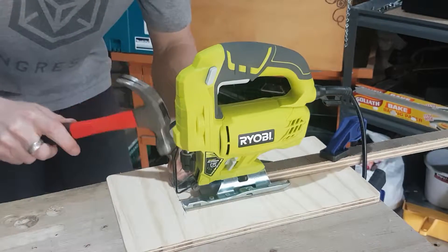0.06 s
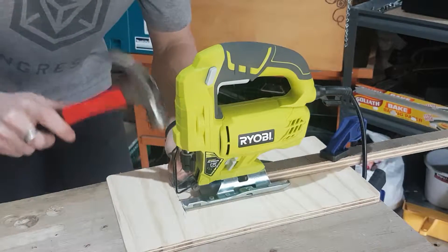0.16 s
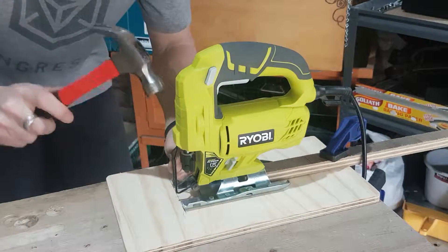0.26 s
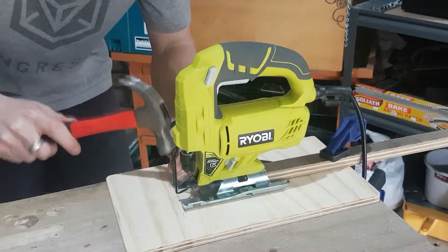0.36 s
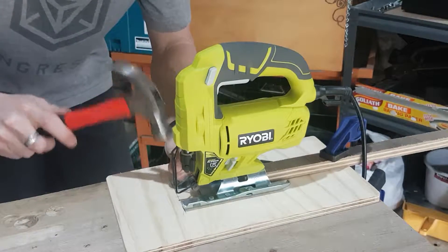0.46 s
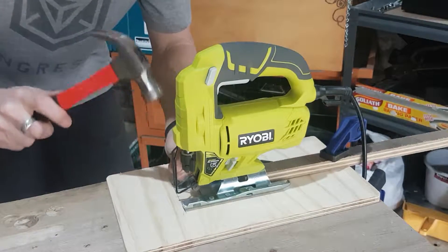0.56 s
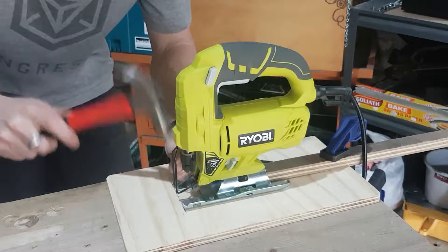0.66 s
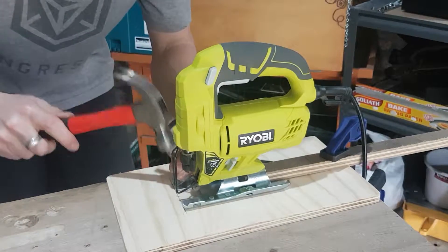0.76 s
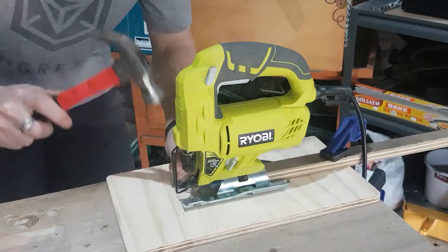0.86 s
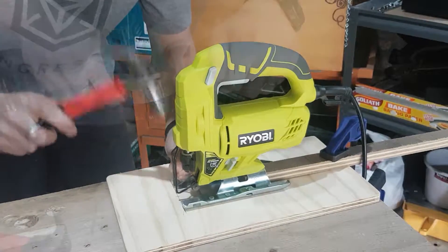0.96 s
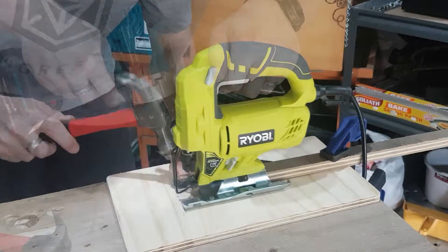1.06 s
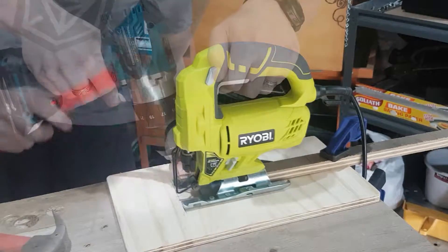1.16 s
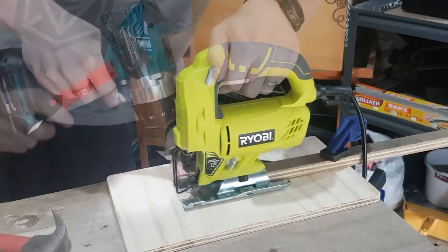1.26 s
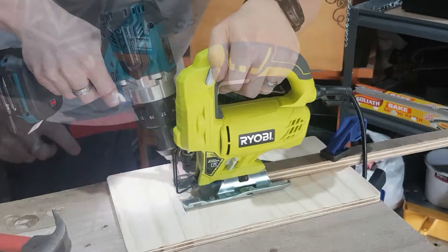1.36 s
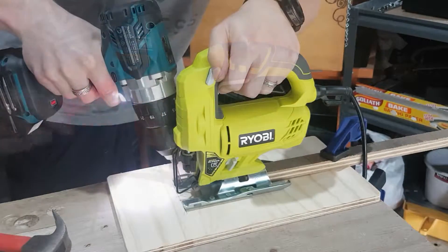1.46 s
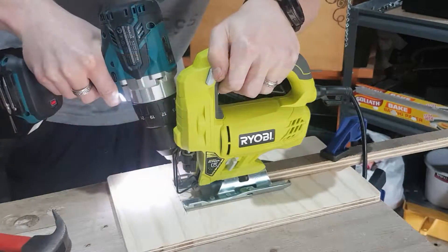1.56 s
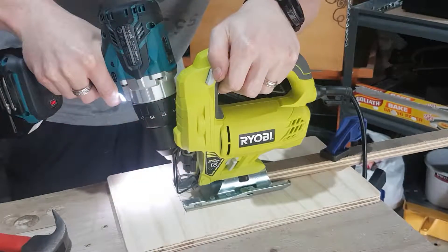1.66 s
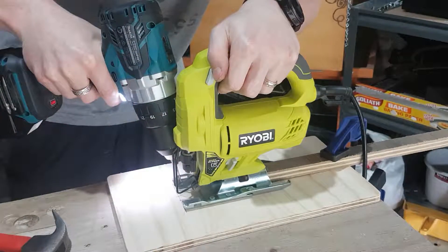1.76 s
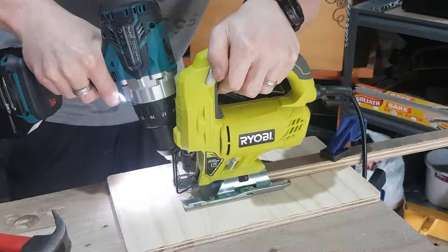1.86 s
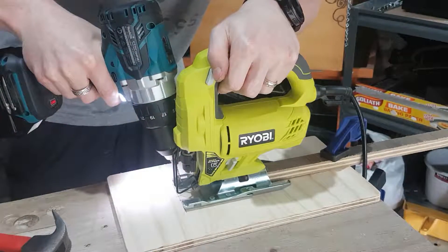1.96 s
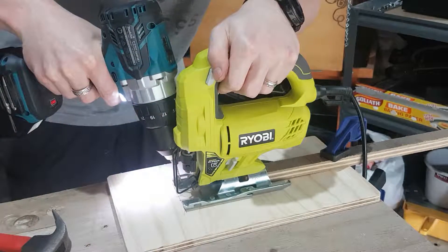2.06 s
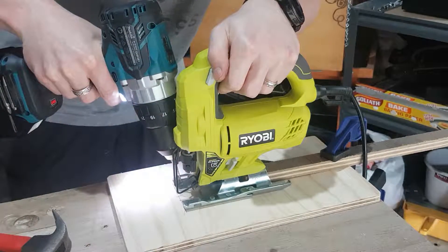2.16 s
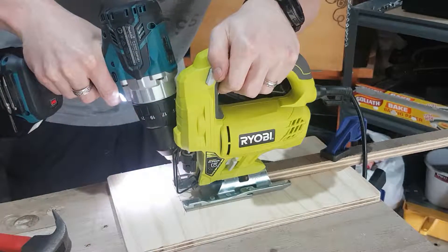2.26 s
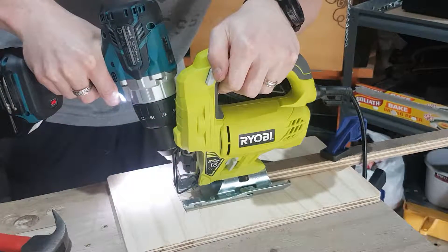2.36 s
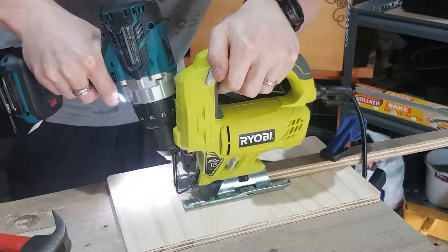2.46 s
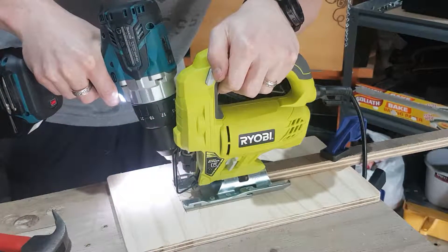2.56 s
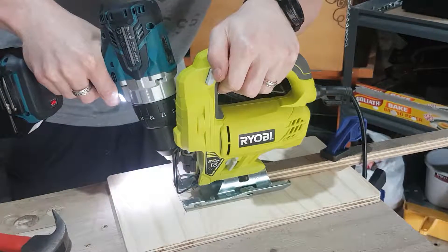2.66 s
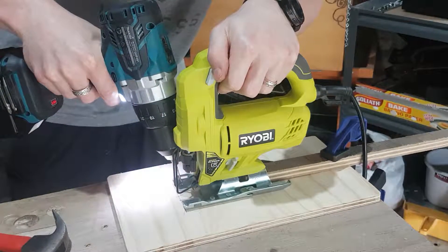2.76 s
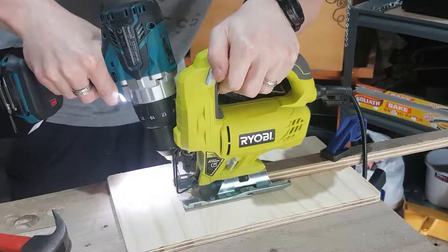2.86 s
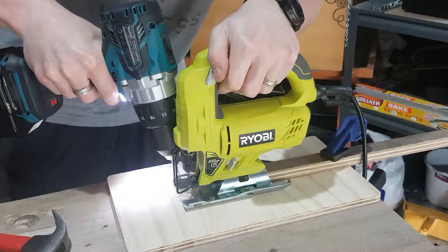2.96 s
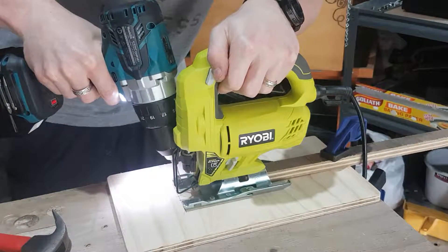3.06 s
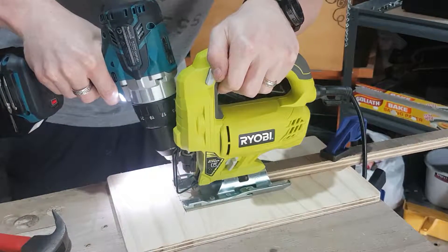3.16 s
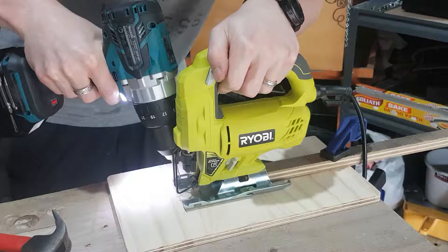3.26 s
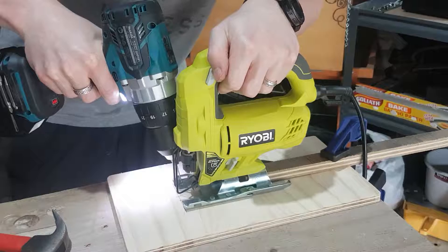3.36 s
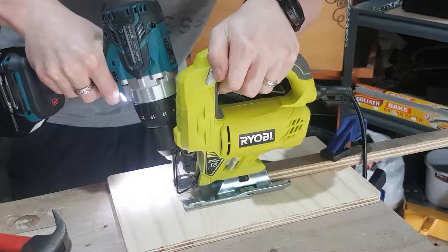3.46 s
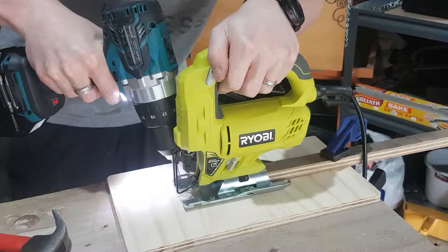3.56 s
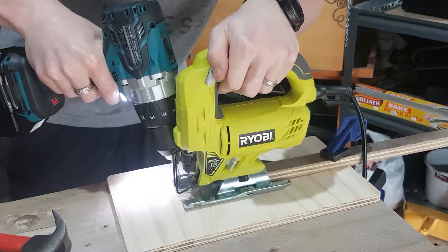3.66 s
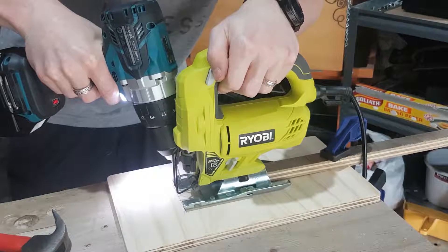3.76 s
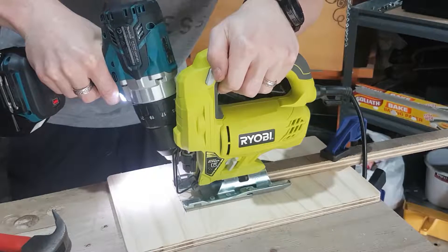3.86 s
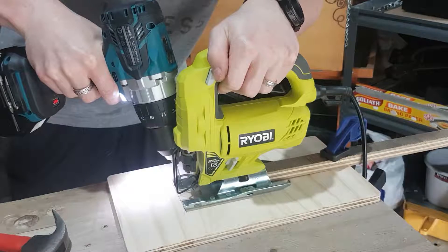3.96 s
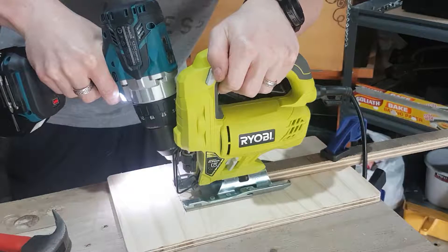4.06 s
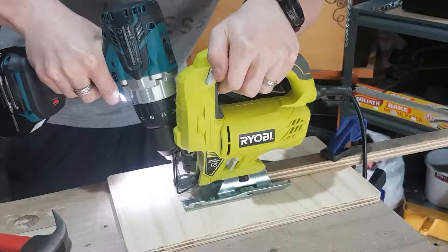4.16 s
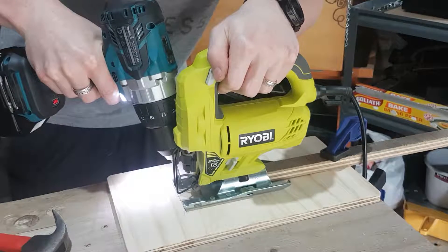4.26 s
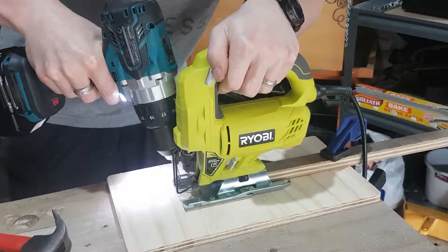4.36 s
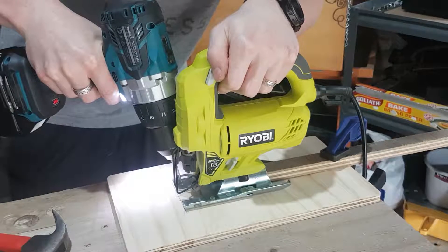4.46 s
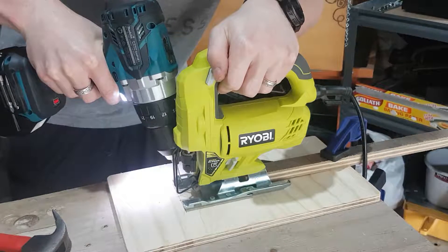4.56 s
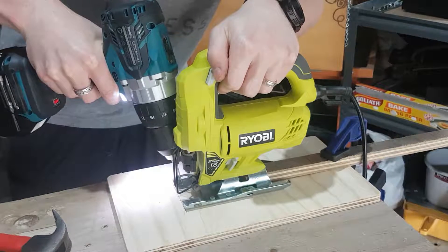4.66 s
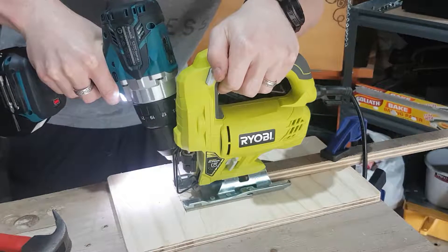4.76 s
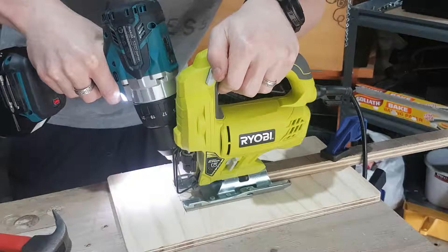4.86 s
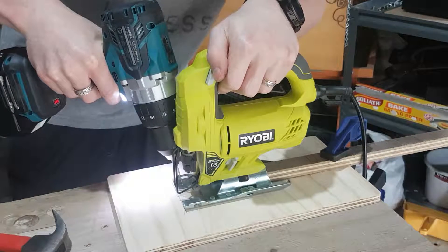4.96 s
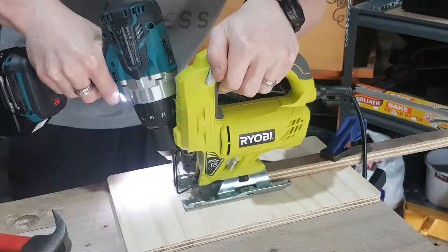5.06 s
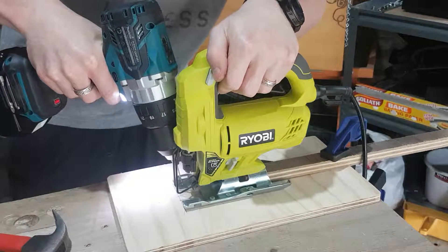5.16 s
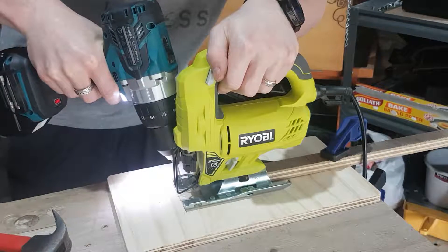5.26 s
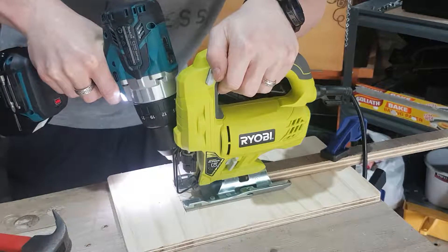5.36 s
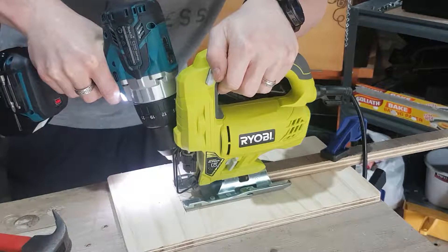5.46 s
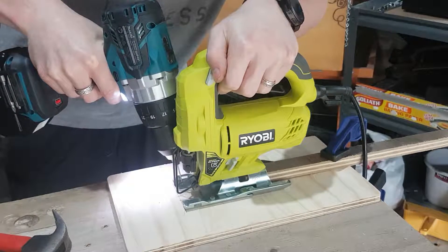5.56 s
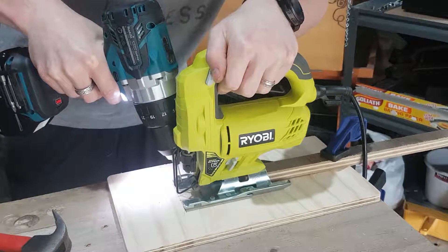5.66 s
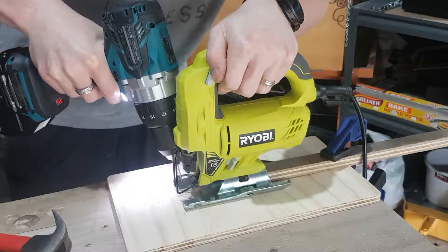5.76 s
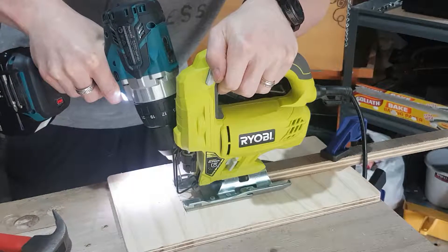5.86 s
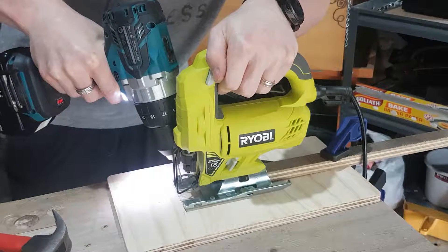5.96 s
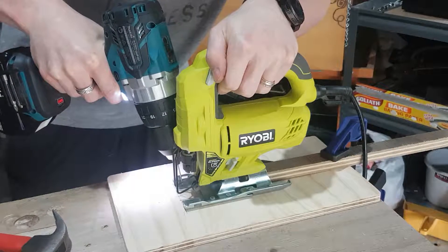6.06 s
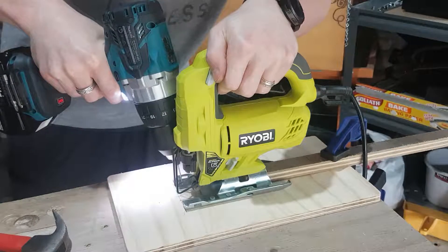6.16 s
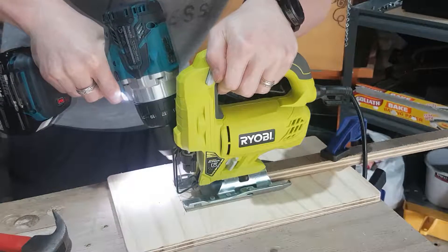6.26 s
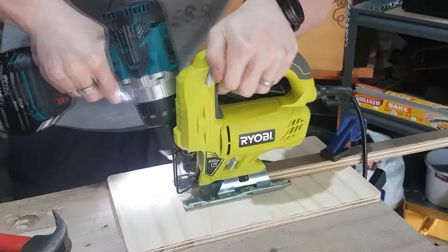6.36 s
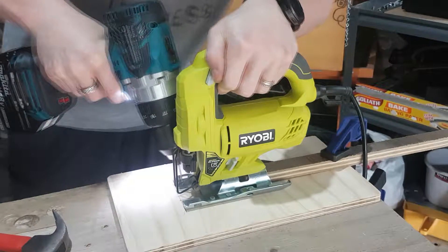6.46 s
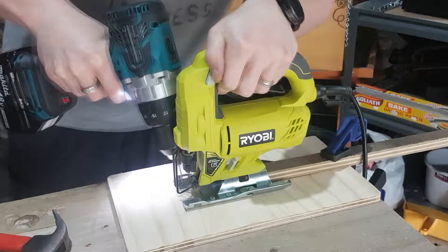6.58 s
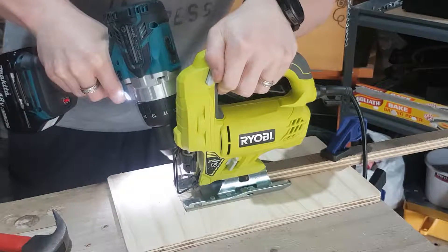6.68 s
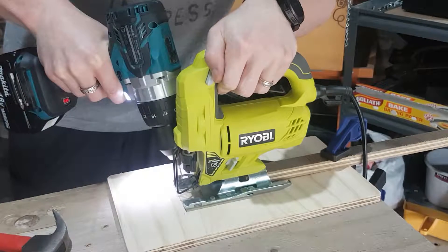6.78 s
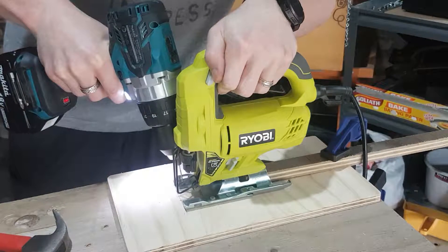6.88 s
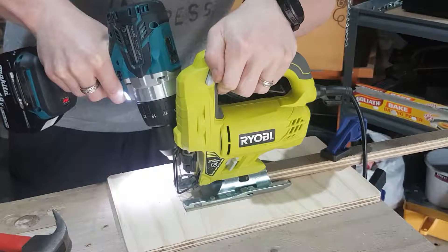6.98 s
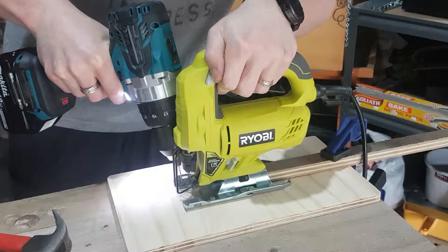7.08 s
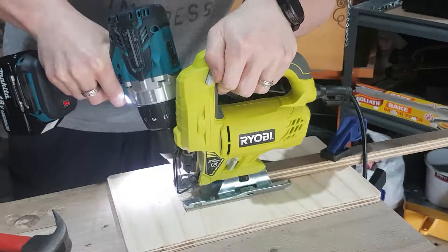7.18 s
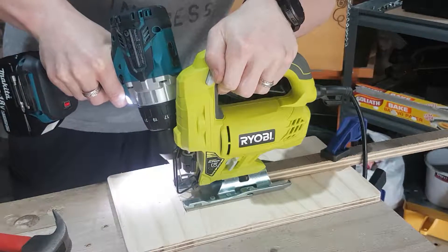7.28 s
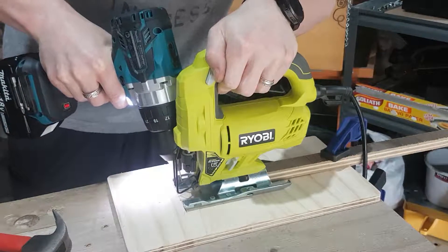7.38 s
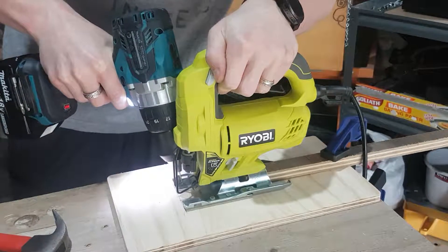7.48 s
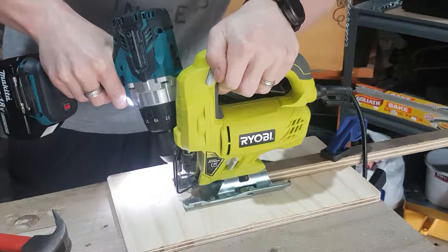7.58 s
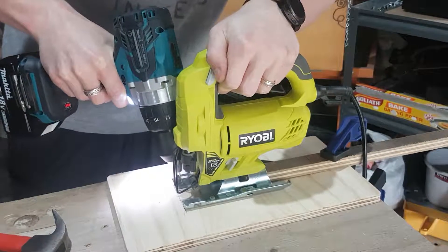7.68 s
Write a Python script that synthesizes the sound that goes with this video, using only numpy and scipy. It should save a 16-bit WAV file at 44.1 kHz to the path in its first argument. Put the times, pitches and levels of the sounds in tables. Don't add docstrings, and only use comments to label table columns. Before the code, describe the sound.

Close stereo sound at a workbench. Loud steel hammer cracks with a woody, ringing bench and short wall echo come evenly, dying away over a second and a half. A faint high electric squeal follows, then a drill motor hums low, jumps higher twice, and finally runs up to full speed. Its buzzing whine, fan hiss and gritty cutting hold to the end, with a slight dip and a dull knock late on.

```python
import sys
import numpy as np
from scipy import signal
from scipy.fft import rfft, irfft, next_fast_len
from scipy.io import wavfile
from scipy.ndimage import uniform_filter1d

SR = 44100
rng = np.random.default_rng(int(sys.argv[2]) if len(sys.argv) > 2 else 0)


def voltage_ratio(decibels):
    exponent = np.asarray(decibels, float) / 20
    return 10 ** exponent


def pcm_store(signal):
    levels = np.round(np.clip(np.atleast_2d(signal), -1, 1) * 32767)
    wavfile.write(sys.argv[1], SR, levels.astype(np.int16).T)


N = 340452


STEPS_HZ = [240, 331, 860, 1080, 1330, 1745]
SHAFT_ORDERS = [1, 4, 5, 6, 7, 8, 10, 11, 12, 16, 20, 28, 40, 24]
# [level/dB rms at each of the six speeds, left lead/rad, pan/dB]
ORDER_LINES = [(-90, -79, -76, -73, -52.5, -64.5, 0.0098, -1), (-90, -56.5, -49.5, -74, -53, -48, 0.15, 8),
               (-90.5, -90, -85, -81, -61, -82, 0.22, 2), (-98, -92, -85, -87, -58.5, -64, 0.29, -6),
               (-88, -87, -85, -85.5, -80, -55, 0.17, -4.5), (-69, -60, -71, -74, -59, -54.5, 0.18, -11.5),
               (-90, -90, -77.5, -56, -59, -80, 0.67, -5), (-92, -83, -82, -75, -69, -73, .8, 0.1),
               (-62, -62, -76, -70, -60, -65.5, 0.92, 7), (-52, -61.5, -42.5, -45, -47.5, -58, 0.69, 1.5),
               (-79, -65.5, -50, -65, -78, -100, 0.58, 0), (-91, -95.5, -85, -89, -80, -79, .1, 1),
               (-80, -62.5, -89, -95, -95, -99, 1, 12), (-71, -70, -81, -95, -95, -99, .8, -5)]
MIRROR_ORDERS = [(1, 4), (1, -4), (1, -8), (1, -16), (1, -32), (2, -4), (2, -24)]
MIRROR_LEVELS = [(-74, -66, -76, -85, -90, -95), (-62, -76, -57, -63, -64, -92),
                 (-88, -91, -79, -76, -57.5, -93), (-78, -66, -55, -49, -64, -95),
                 (-90, -66, -95, -99, -99, -99), (-72, -75, -79, -82, -85, -95),
                 (-95, -73, -87, -95, -95, -99)]
# [t/s, level/dB]
STALL = [(1.25, -95), (1.262, -70), (1.38, -71), (1.5, -75), (1.6, -67), (1.63, -74), (2.05, -78),
         (2.2, -93)]
# [t/s, new pole pitch f/Hz, jump/s, creeping share, creep/s]
SQUEEZES = [
    (2.854, 893, .015, .6, .105),
    (3.195, 950, .06, 0, .1),
    (3.238, 1332, .015, .45, .12),
    (4.82, 1750, .015, 2.1, .031),
]
# [pole pitch f/Hz, whine level/dB, grind level/dB, hiss level/dB, rumble level/dB]
BY_SPEED = [(1.004, -59, -65.5, -80.5, -65), (55, -50, -66.5, -86, -70.5), (155, -30, -61.5, -81, -66),
            (195, -18, -59, -78, -66), (221, -10, -56.5, -76, -67), (280, -3, -56, -72, -77),
            (340, -1.5, -56, -68, -66), (450, 3, -49.5, -66, -64), (624, -3, -47, -61, -61),
            (750, 1, -48, -59, -60), (860, -1.5, -47.5, -55, -77.5), (1200, 5, -45, -48.5, -62),
            (1326, -1, -43.5, -46, -68), (1590, 4.5, -42, -41, -62), (1720, 1.5, -39.5, -39, -60.5)]
# [pole pitch f/Hz, level/dB]
PINION_BY_SPEED = [(900, -78.5), (1200, -63), (1335, -61), (1600, -60), (1690, -50), (1740, -44.5)]
# [t/s, level/dB]
PUSH = [(4.95, 0), (6.13, 0), (6.27, -2.5), (6.54, -4), (6.75, -0.5), (6.85, 1), (7.13, 2), (7.3, 1.5),
        (7.72, 0.5)]
# [t/s, 4th turn pan/dB, 8th turn level/dB, 8th turn pan/dB]
LEAN = [(3.2, -6, 11, 13), (3.3, -15, 10, 13), (3.6, -15, 7, 13), (3.68, -8, 11, 11), (4.8, -15, 11, 16),
        (5, 14.5, 7, 13), (5.5, 7.5, 7.5, 12), (5.9, 5, 1, -10), (6.4, 5, -6, -10.5), (6.6, -7, -1, 19),
        (7, -18, 0, 10), (7.3, -3, -1.5, 13), (7.47, 3, -2, 12), (7.53, 4, 9, 12), (7.72, 9, 8, 10)]

# [f/Hz, level/dB per Hz]
CUTTING = [(150, -36), (250, -23), (425, -21.5), (481, -19), (692, -18.5), (1210, -8.5), (1620, -7),
           (1740, -7), (1860, -6), (2230, -11), (3580, -9.5), (4010, -12), (7000, -15.5), (9100, -32.5),
           (15400, -120)]
# [f/Hz, level/dB per Hz]
SLOW_GEARS = [(200, -45), (500, -25), (1000, -23), (2200, -28.5), (2700, -15.5), (3500, -18), (5400, -19.5),
              (5900, -25.5), (8300, -27), (9300, -33), (10500, -58), (13500, -34), (15700, -39)]
# [f/Hz, level/dB per Hz]
FAN_HISS = [(2940, -5), (5000, -3), (5450, -5), (6030, -10), (7920, -3), (8880, -4.5), (10300, -3),
            (11100, 0), (13700, -1), (15100, -4.5), (15700, 0)]
# [f/Hz, level/dB per Hz]
RUMBLE = [(12, -59), (20, -42), (108, 3), (182, -9), (296, -20), (329, 4), (372, -9.5), (500, -18),
          (650, -4), (1100, -120)]
# [t/s, level/dB]
SLACK = [(2.1, -90), (2.135, -62), (2.17, -61), (2.2, -75), (2.25, -95)]
# [f/Hz, level/dB per Hz]
SLACK_COLOUR = [(300, -15), (600, -3), (850, 0), (1300, -3), (2000, -20)]
# [t/s, peak level/dB]
KNOCKS = [
    (2.066, -51),
    (6.536, -54),
    (6.566, -57),
    (7.147, -34.5),
    (7.217, -39),
]
# [f/Hz, likeness 0-1]
DRILL_LIKENESS = [(60, .95), (400, .9), (800, .63), (1200, .5), (1800, .1), (4200, .1), (6500, -.03),
                  (8800, .1), (9700, .9), (10700, .998)]
# [f/Hz, pan/dB]
DRILL_BALANCE = [(60, 0.5), (150, -1), (380, -0.5), (950, 0), (2380, 0), (5980, 2.5), (15000, -3.5)]

# [t/s, peak level/dB, brightness level/dB, bass level/dB, board body level/dB]
BLOWS = [
    (0.1198, 2.4, -1, 3, 2),
    (0.43, -1.5, 4, 4, 2),
    (0.7492, -3.5, 2, 1, 1.5),
    (1.0718, -11.5, 6, 0.5, 7),
    (1.397, -19, 5, 1, 5.5),
]
EARLIER_BLOW = (-0.4, -20.5, -2, 9, -15)
CRACK_DB = [-0.5, 0, -5.5, -1, 0.5, 0.5]
# [f/Hz, level/dB, t60/s]
BENCH = [(164.2, -6.5, 0.42), (280, -8, 0.55), (353, -18, 0.18), (430, -14, 0.3), (593, -15.5, 0.36),
         (667, -7, 0.2), (832, -6.5, 0.3), (962, -10.5, 0.21), (1111, -15, 0.27), (322, -12.5, 0.25),
         (1355, -22, 0.28), (1250, -20, 0.2), (1350, -24, 0.14), (1460, -23.5, 0.28), (1615, -26.5, 0.35),
         (2010, -20.5, 0.4), (2060, -28.5, 0.38), (2080, -19.5, 0.2), (2510, -17.5, 0.24),
         (2810, -20, 0.36), (3000, -18, 0.19), (3060, -32, 0.25)]
# [f/Hz, level/dB, t60/s]
LOOSE_METAL = [(1365, -32, 0.84), (395, -21.5, 0.78), (6590, -21, 0.12), (272, -23, 0.6), (511, -14, 0.37),
               (548, -17, 0.33), (1255, -6, 0.07), (780, -20, 0.45), (1809, -22, 0.2), (1660, -22, 0.24)]
# [f/Hz, level/dB per Hz]
ECHO = [(24, -54.5), (40, -30), (121, -21.5), (167, -6.5), (215, -13.5), (283, 0.5), (400, -4.5),
        (520, -4.5), (646, -4.5), (715, -11), (965, -11.5), (1040, -10.5), (1150, -14), (1260, -9),
        (1450, -12.5), (2100, -16), (2650, -16), (3300, -21), (4400, -23), (5300, -28), (6100, -25.5),
        (7500, -32), (12000, -36), (16000, -40)]
# [f/Hz, t60/s]
ECHO_T60 = [(60, 0.55), (160, 0.34), (280, 0.31), (450, 0.38), (1100, 0.34), (2910, 0.3), (7680, 0.28)]
# [f/Hz, likeness 0-1]
BLOW_LIKENESS = [(60, 0.65), (150, 0.93), (380, 0.88), (950, 0.22), (2380, 0.037), (5980, 0.04),
                 (15000, 0.23)]
# [f/Hz, pan/dB]
BLOW_BALANCE = [(60, -0.5), (180, -3), (550, 0.5), (1650, -0.5), (4970, 1.5), (15000, -1.5)]
# [t/s,
# level/dB, f/Hz, share in the right one]
JOLTS = [
    (0.434, -16, 90, 0.3),
    (0.748, -27, 96, 0.1),
    (0.755, -14, 195, .4),
    (0.763, -32, 80, 0),
    (1.077, -35, 100, .1),
    (1.401, -42, 110, -0.9),
]
# [t/s, level/dB]
HAMMER_AIR = [(0, -56), (1.2, -71), (1.5, -57), (1.58, -49), (1.6, -48), (1.62, -44)]
# [f/Hz, level/dB per Hz]
RUSTLE = [(35, -29), (60, -8), (110, -5), (200, -14), (336, -10), (631, -19), (1130, -17), (1210, -32),
          (1600, -18), (3000, -17), (15700, -36)]

# [f/Hz, level/dB per Hz]
ROOM_AIR = [(18, -35), (30, -5), (59, -4), (127, -4), (160, -2.5), (220, -11), (278, -5.5), (400, -11),
            (1880, -10.5), (3200, -16.5), (5600, -35), (6400, -30), (9000, -34), (10500, -55), (15700, -38)]
# [t/s, level/dB]
AIR_RISE = [(1.6, -5), (1.7, -2), (1.8, -0.5), (2.2, 0)]
# [t/s, level/dB]
SEAM = [(1.255, -90), (1.262, -65), (1.3, -73), (1.385, -75), (1.5, -74), (1.55, -73), (1.608, -67),
        (1.618, -95)]
# [f/Hz, level/dB per Hz]
SEAM_AIR = [(2000, -20), (5200, -3), (6200, -6), (8000, -2), (9300, -4), (10100, -14), (11000, 0),
            (15700, 0)]
# [t/s, level/dB]
SEAM_HUM = [(1.5, -90), (1.56, -60), (1.61, -56), (1.65, -68), (1.7, -90)]
# [from t/s, to t/s, 1 = as the left one's mirror]
HELD_OVER = [(5.965, 6.045, 0), (6.075, 6.195, 0), (6.235, 6.25, 1), (6.34, 6.405, .3), (6.62, 6.65, .6),
             (6.755, 6.78, .6), (6.835, 6.85, .7), (6.925, 6.96, .6), (7.0, 7.03, .6), (7.2, 7.225, .6),
             (7.29, 7.345, 0), (7.345, 7.415, 1), (7.415, 7.49, .2), (7.57, 7.63, 0)]


def motor():
    switch_hz, stall_hz = 7945, 7880
    t = np.arange(N) / SR
    pole_hz, whine_db = speed(), by_speed(BY_SPEED)[0]
    turn = 2 * np.pi * np.cumsum(pole_hz / 4 * (1 + 0.000603 * drift(7.6))) / SR

    slowness = np.clip((1300 - pole_hz) / 700, 0, 1)
    rush_hz_per_s = np.maximum(np.gradient(uniform_filter1d(pole_hz, size=400)) * SR, 0)
    rush_db = -17 * np.tanh((rush_hz_per_s / 6500) ** 1.5)

    lean4_pan, lean8_db, lean8_pan = in_time(LEAN)
    lean = {4: (0.78 * in_time(PUSH)[0], lean4_pan), 8: (lean8_db, lean8_pan)}
    out = line(2 * np.pi * stall_hz * t, in_time(STALL)[0], .6, 0, flicker_db=2.5, blur=1.6)
    for order, (*steps_db, lead, pan_db) in zip(SHAFT_ORDERS, ORDER_LINES):
        if order == 16:
            rush_share = np.maximum(slowness ** 2, .25)
        else:
            rush_share = np.maximum(slowness, .6 * (order > 9))
        if order == 8:
            rush_share = .4 * rush_share
        lean_db, lean_pan_db = lean.get(order, (0, 0))
        level_db = np.interp(pole_hz, STEPS_HZ, steps_db) + whine_db + rush_db * rush_share + lean_db
        wander = min(order / 16, 1)
        lead = lead + pole_hz / 1500 + .5 * wander * drift(1.3)
        pan_db = pan_db + lean_pan_db + 3 * wander * drift(2.3)
        out += line(order * turn, level_db, lead, pan_db, flicker_db=.9 if order == 8 else 1.5,
                    blur=.12 + order ** 1.3 / 140)
    for (multiple, order), steps_db in zip(MIRROR_ORDERS, MIRROR_LEVELS):
        phase = 2 * np.pi * multiple * switch_hz * t + order * turn
        level_db = np.interp(pole_hz, STEPS_HZ, steps_db) + whine_db + .5 * rush_db
        out += line(phase, level_db, 1.0, 0, flicker_db=2.0, blur=.2 + abs(order) / 50)
    return out


def speed():
    t = np.arange(N) / SR
    before = 332
    start_s, soft_start_s = 1.89, .263
    out = before * (1 - np.exp(-(np.maximum(t - start_s, 0) / soft_start_s) ** 2))
    for s, hz, jump, share, creep in SQUEEZES:
        since = np.maximum(t - s, 0)
        left_to_go = (1 - share) * np.exp(-since / jump) + share * np.exp(-since / creep)
        out = out + (hz - before) * (1 - left_to_go)
        before = hz
    sag = 4.3 * (np.clip(t, 5, 7.05) - 5)
    bite = 6 * np.exp(-((t - 7.13) / .05) ** 2)
    return out - sag - bite


def pinion():
    teeth, slip_s, slip_hz, slip_back_s = 23, 6.25, 280, .035
    t = np.arange(N) / SR
    slip = slip_hz * (t > slip_s) * np.exp(-np.maximum(t - slip_s, 0) / slip_back_s)
    tooth_hz = teeth * speed() / 4 - slip
    level_db = by_speed(PINION_BY_SPEED)[0] + 1.6 * in_time(PUSH)[0]
    pan_db = np.interp(t, [4.9, 5.0, 5.5, 5.75], [-5, -4.5, -4.5, 2.5])
    return line(2 * np.pi * np.cumsum(tooth_hz) / SR, level_db, 0, pan_db, flicker_db=0.9)


def drill_noise():
    _, grind_db, hiss_db, rumble_db = by_speed(BY_SPEED)
    push_db = in_time(PUSH)[0]
    fast = np.clip((speed() - 340) / 800, 0, 1)
    gears = np.sqrt(1 - fast) * flutter_noise(SLOW_GEARS, patchy_db=.7, rate=18)
    cutting = np.sqrt(fast) * flutter_noise(CUTTING, patchy_db=0.26, rate=9.3)
    grind = voltage_ratio(grind_db + 0.89 * push_db + 1.34) * (gears + cutting)
    hiss = voltage_ratio(hiss_db + 0.68 * push_db + 2.0) * flutter_noise(FAN_HISS, patchy_db=0.47, rate=32)
    rumble = voltage_ratio(rumble_db + 1.3 * push_db + 0.5) * flutter_noise(RUMBLE, patchy_db=3.0, rate=3.7)
    slack = voltage_ratio(in_time(SLACK)[0]) * flutter_noise(SLACK_COLOUR, patchy_db=3.0, rate=30)
    return grind + hiss + rumble + slack


def knocks():
    t, out = np.arange(SR // 8) / SR, np.zeros(N)
    wood = 0
    for hz, t60 in [(340, 0.2), (560, 0.13), (820, 0.14)]:
        wood = wood + np.sin(2 * np.pi * hz * t) * voltage_ratio(-60 * t / t60)
    for s, peak_db in KNOCKS:
        out[round(s * SR):][:len(t)] += voltage_ratio(peak_db - 9.5) * wood
    return out


def hammer():
    size, lead = SR, SR // 2
    out = np.zeros((2, N + lead + size))
    shared = workshop_echo(size)
    nail_levels = [0, 0, 0, 1, 3, 6]   # dB, blow by blow
    for blow_row, crack_db, nail_db in zip([EARLIER_BLOW] + list(BLOWS), CRACK_DB, nail_levels):
        s, peak_db, bright_db, bass_db, body_db = blow_row
        room = 0.72 * shared + 0.27 * workshop_echo(size)
        blow = bench_ring(size, peak_db) + contact(size, crack_db) + voltage_ratio(-13.0) * room
        bass = signal.sosfilt(signal.butter(2, 230, fs=SR, output="sos"), blow)
        blow = blow + (voltage_ratio(bright_db) - 1) * above(blow, 1500) + (voltage_ratio(bass_db) - 1) * bass
        blow = blow + (voltage_ratio(body_db) - 1) * around(blow, 560, 1.6)
        blow = blow - .6 * around(blow, 697, 7.0)
        blow = blow + (voltage_ratio(nail_db) - 1) * around(blow, 2720, 5.0)
        at = lead + round(s * SR)
        out[:, at:at + size] += voltage_ratio(peak_db) * blow
    return out[:, lead:lead + N]


def contact(size, crack_db):
    t = np.arange(size) / SR
    steel = -np.sin(2 * np.pi * 1450 * t) * np.exp(-t / 0.00053)
    steel -= 0.16 * np.sin(2 * np.pi * 3100 * t) * np.exp(-t / 0.0012)
    steel += 0.1 * np.sin(2 * np.pi * 6700 * t) * np.exp(-t / 0.0007)
    bounce_s, bounce_db = .0032, -7
    steel = steel + voltage_ratio(bounce_db) * np.interp(t - bounce_s, t, steel, left=0)
    board = 0.61 * np.sin(2 * np.pi * 600 * t) * np.exp(-((t - .0014) / 0.00066) ** 2)
    tick = rng.standard_normal((2, size)) * np.exp(-t / 0.00092)
    return voltage_ratio(2.5) * (voltage_ratio(crack_db) * steel - board) + voltage_ratio(-14.5) * tick


def bench_ring(size, peak_db):
    t = np.arange(size) / SR
    hz, level_db, t60 = np.transpose(list(BENCH) + list(LOOSE_METAL))[:, :, None]
    twin = 1 - rng.uniform(6.6, 16, hz.shape) / hz
    partner = 0.47 * np.clip((hz - 165) / 110, 0, 1)
    strength = voltage_ratio(level_db - 15 + 0.3 * peak_db + rng.normal(0, 2.6, hz.shape))
    scatter = rng.normal(0, 1, (2, len(hz), 1)) * hz / 2200
    low_lead = .3 * (hz < 200) * np.array([1, -1])[:, None, None]
    turn = 2 * np.pi * hz * t + scatter + low_lead
    modes = strength * (np.sin(turn) + partner * np.sin(turn * twin)) * voltage_ratio(-60 * t / t60)
    return np.sum(modes, axis=1) * (1 - np.exp(-t / 0.0022))


def workshop_echo(size):
    pair, hz = coloured(size, ECHO, BLOW_LIKENESS, BLOW_BALANCE)
    t = np.arange(size) / SR
    hold_s = .02
    out = 0
    for c in 30 * 2. ** np.arange(10):
        swell = 1 - np.exp(-t / (0.00027 + 0.51 / c))
        fall = voltage_ratio(-66 * t * t / (t + hold_s + 1e-4) / at_hz(ECHO_T60, c))
        tail = voltage_ratio(-41 - 60 * t / 1.1)
        out = out + irfft(pair * octave_share(hz, c), size) * swell * (fall + tail)
    return out / np.sqrt(np.mean(out[:, :SR // 20] ** 2))


def jolts():
    t, out = np.arange(N) / SR, np.zeros((2, N))
    for s, jolt_db, hz, right in JOLTS:
        thump = 1.66 * np.sin(2 * np.pi * hz * (t - s)) * np.exp(-((t - s) * hz * 2.65) ** 2)
        out += np.array([[1], [right]]) * voltage_ratio(jolt_db) * thump
    return out


def arm_rustle():
    return voltage_ratio(in_time(HAMMER_AIR)[0]) * flutter_noise(RUSTLE, patchy_db=0.5, rate=11)


def seam():
    t = np.arange(N) / SR
    hum = line(2 * np.pi * 344 * t, in_time(SEAM_HUM)[0], 0, 0, flicker_db=1.5)
    air = voltage_ratio(in_time(SEAM)[0]) * flutter_noise(SEAM_AIR, patchy_db=0.0, rate=20)
    return hum + air * (t < 1.62)


def room_air():
    return voltage_ratio(-62.5 + in_time(AIR_RISE)[0]) * flutter_noise(ROOM_AIR, patchy_db=.8, rate=9)


def line(phase, level_db, lead, pan_db, flicker_db, blur=0.2):
    sides = np.array([[.5], [-.5]])
    flicker = flicker_db * (drift(15.3) + 0.75 * drift(4.9))
    gain = np.sqrt(2) * voltage_ratio(level_db + flicker + sides * pan_db)
    wobble = blur * (drift(13) + 0.16 * drift(110))
    return gain * np.sin(phase + wobble + sides * lead)


def flutter_noise(spectrum, patchy_db, rate):
    size = next_fast_len(N)
    pair, hz = coloured(size, spectrum, DRILL_LIKENESS, DRILL_BALANCE)
    low, high, together = spectrum[0][0], spectrum[-1][0], drift(rate)
    out = 0
    for c in 30 * 2. ** np.arange(10):
        if low / 2 < c < high * 2:
            octave = irfft(pair * octave_share(hz, c), size)[:, :N]
            out = out + octave * voltage_ratio(patchy_db * (0.69 * together + drift(rate)))
    return rms_one(out)


def coloured(size, spectrum, likeness, balance):
    hz = np.maximum(np.fft.rfftfreq(size, 1 / SR), 1)
    mid, side = rfft(rng.standard_normal((2, size)))
    alike = np.clip(at_hz(likeness, hz), -1, 1)
    pair = np.sqrt(1 + alike) * mid + np.sqrt(1 - alike) * side * [[1], [-1]]
    pan = at_hz(balance, hz) * np.array([[.5], [-.5]])
    return pair * voltage_ratio(at_hz(spectrum, hz) + pan), hz


def octave_share(hz, centre):
    return np.cos(np.pi / 2 * np.clip(np.log2(hz / centre), -1, 1)) ** 2


def drift(rate):
    r = np.exp(-128 * np.pi * rate / SR)
    slow = signal.lfilter([1], [1, -2 * r, r * r], rng.standard_normal(N // 64 + 2002))[2000:]
    return np.interp(np.arange(N) / 64, np.arange(len(slow)), rms_one(slow))


def rms_one(x):
    return x / np.sqrt(np.mean(x ** 2) + 1e-20)


def above(x, hz):
    return signal.lfilter([1, -1], [1, -np.exp(-2 * np.pi * hz / SR)], x)


def around(x, hz, q):
    return signal.lfilter(*signal.iirpeak(hz, q, fs=SR), x)


def in_time(rows):
    s, *columns = np.transpose(rows)
    return [np.interp(np.arange(N) / SR, s, c) for c in columns]


def by_speed(rows):
    hz, *columns = np.transpose(rows)
    pole_hz = speed()
    return [np.interp(pole_hz, hz, c) for c in columns]


def at_hz(points, hz):
    f, value = np.transpose(points)
    return np.interp(np.log(hz), np.log(f + 1e-9), value)


def scene():
    t = np.arange(N) / SR
    hammer_on = np.clip((1.615 - t) / 0.0045, 0, 1)
    drill_on = np.clip((t - 1.2) / .01, 0, 1)
    drill = motor() + pinion() + drill_noise() + knocks()
    nailing = hammer() + jolts() + arm_rustle()
    return drill_on * (drill + seam() + room_air()) + hammer_on * nailing


def roll_off(x):
    return signal.sosfilt(signal.butter(12, 16940, fs=SR, output="sos"), x)


def record(dry):
    low_pass = signal.ellip(12, .5, 70, 15700, fs=SR, output="sos")
    x = signal.sosfilt(low_pass, np.clip(dry, -.95, .95))
    pinion_band = signal.butter(4, (9700, 10500), "band", fs=SR, output="sos")
    left, right = signal.sosfiltfilt(pinion_band, x)
    t = np.arange(N) / SR
    for start, end, mirror in HELD_OVER:
        over = uniform_filter1d(1. * ((t > start) & (t < end)), size=400)
        turned = mirror * left + (1 - mirror) * .7 * right
        x[1] -= over * (right + turned)
    return roll_off(x)


dry = scene()
out = record(dry)
pcm_store(out)
```